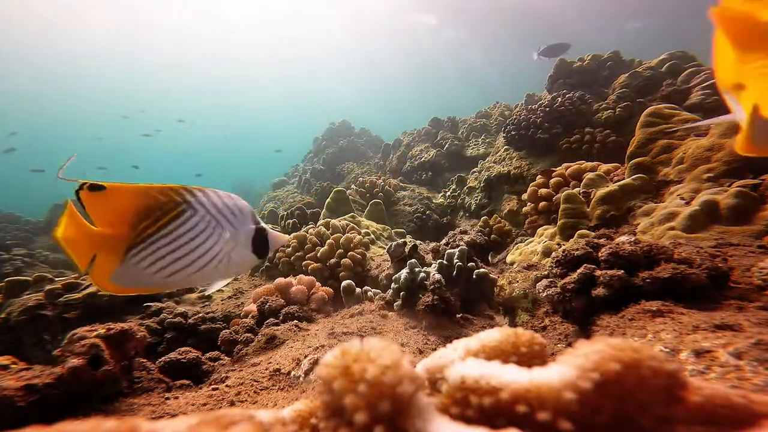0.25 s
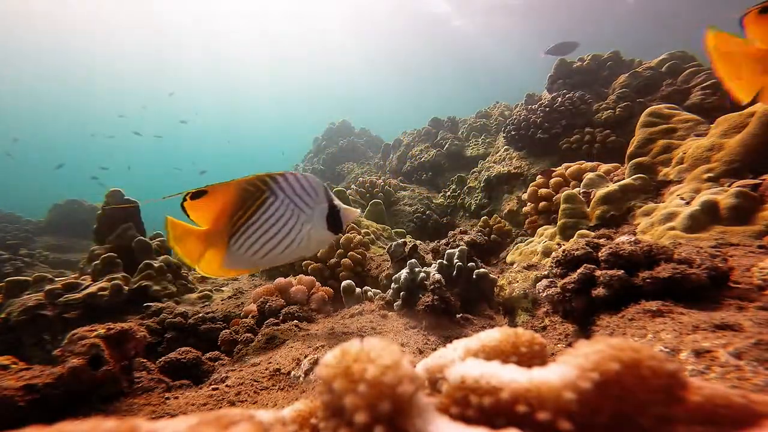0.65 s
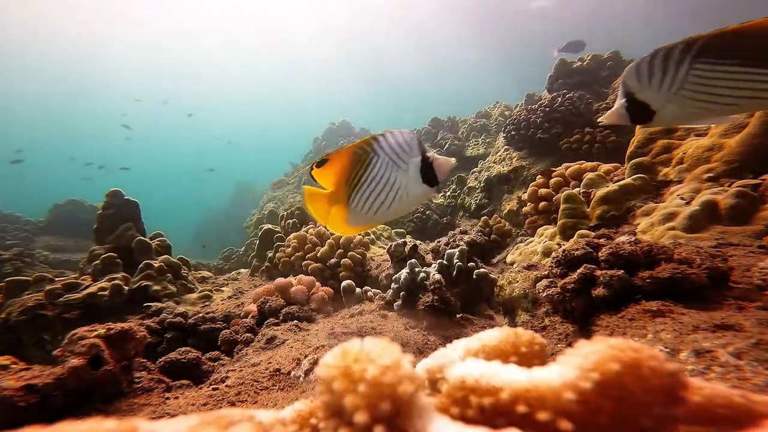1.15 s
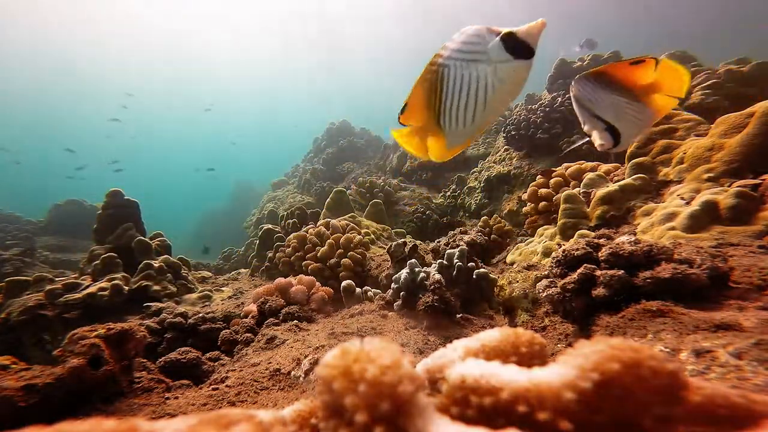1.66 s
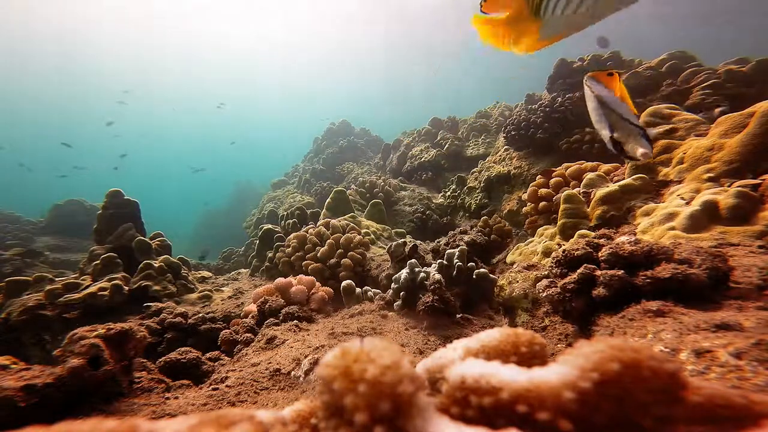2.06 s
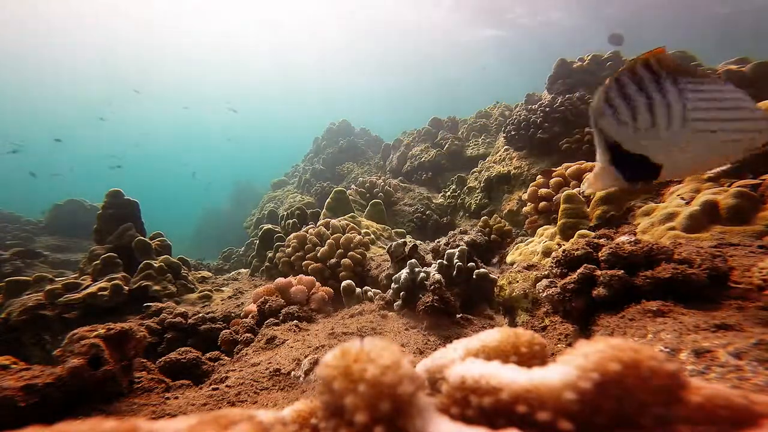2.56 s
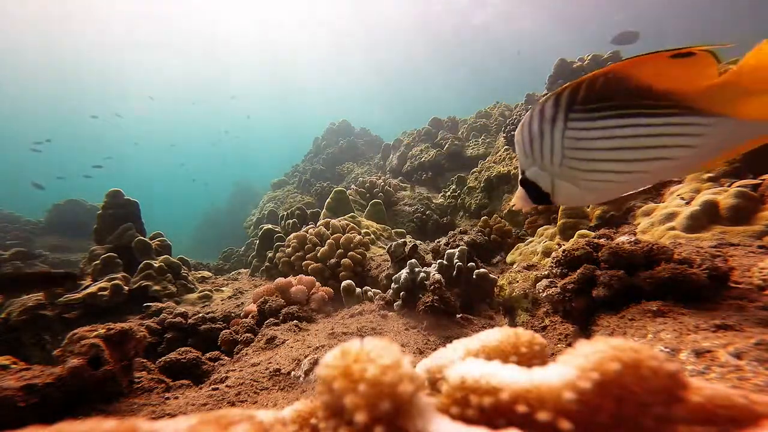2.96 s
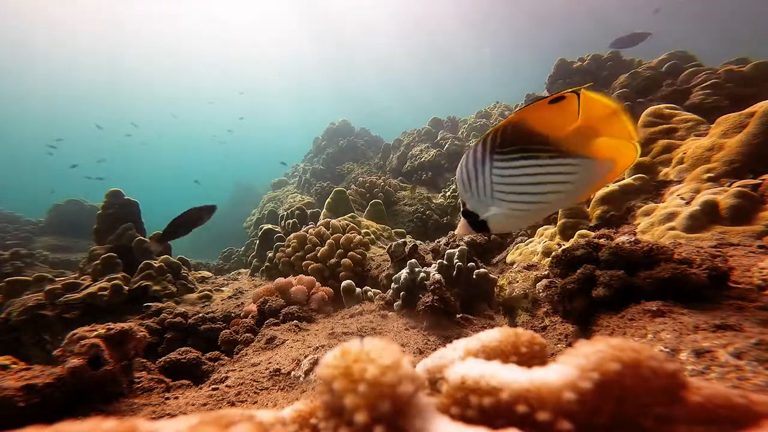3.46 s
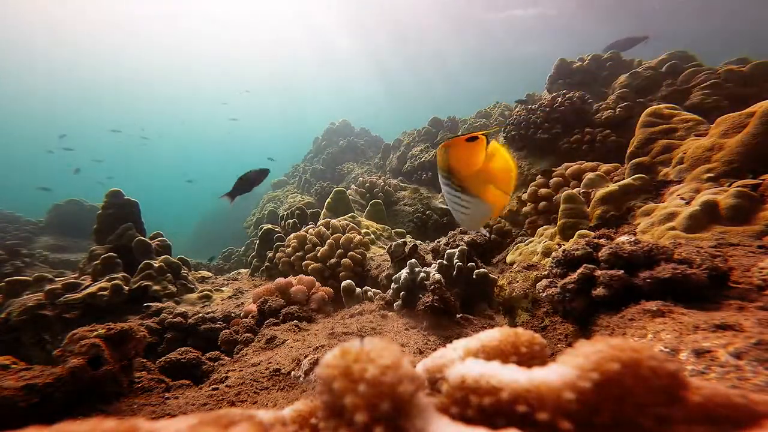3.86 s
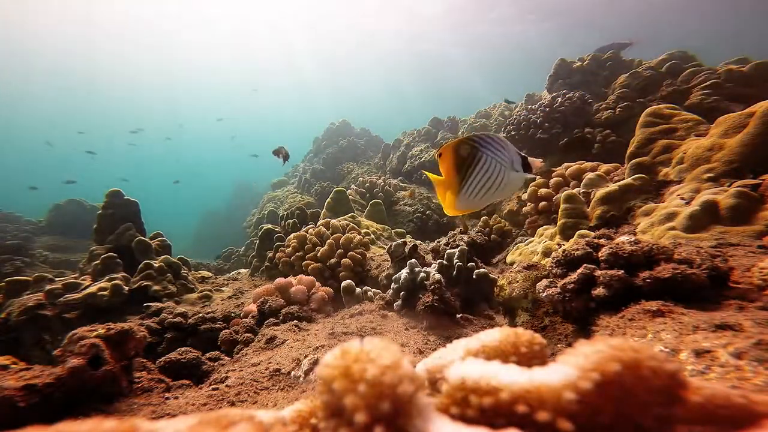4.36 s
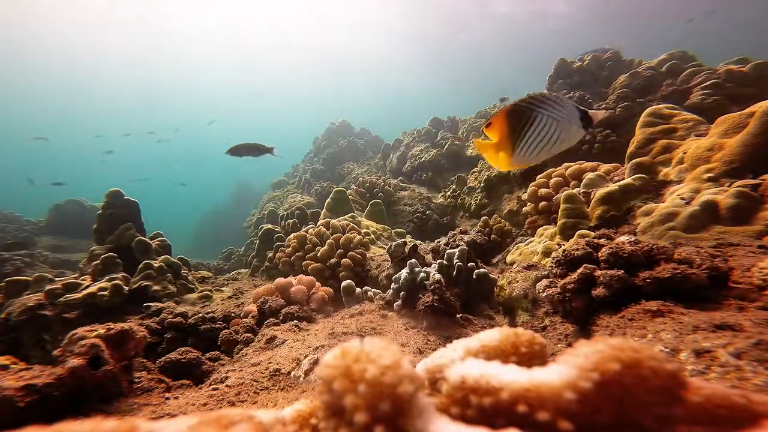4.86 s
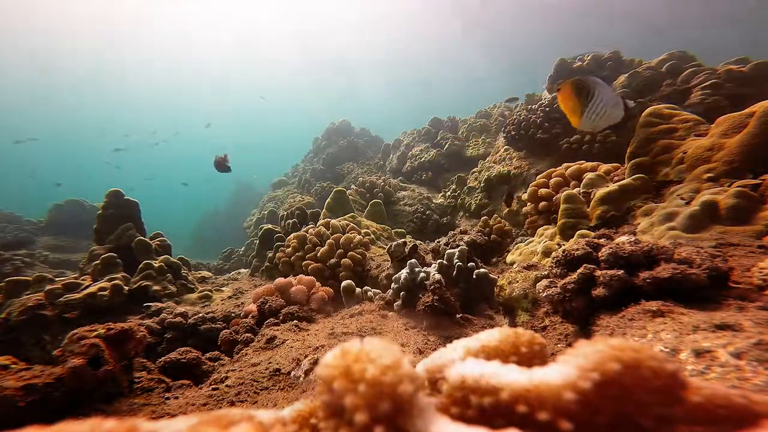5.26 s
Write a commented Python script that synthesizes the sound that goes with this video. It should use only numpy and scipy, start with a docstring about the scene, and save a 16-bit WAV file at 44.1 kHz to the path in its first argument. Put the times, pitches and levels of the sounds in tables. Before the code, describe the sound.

Close, boxy underwater sound from a microphone sealed in plastic. It starts nearly quiet, with soft surge, tiny snaps and a few faint taps. Irregular pecking follows: dry clacks, short hollow thuds and gritty scrapes, strongest from 3.3 seconds on. After the last rapid blows the background dips and a very deep rocking hum remains.

```python
"""Something, probably a fish, pecks at the plastic housing of a camera on a shallow reef, on the whole harder and harder.
Hard knocks and rasping scrapes each excite a bank of decaying modes: a boom in the mount, a thud in the wall,
a clack and a tick in the shell. Snapping shrimp, close by and far off, are bursts of noise with a short ring.
Under them lie the muffled surge of the water, as coloured noise, and a low sine for the wobble of the mount.
The microphone is inside the housing; shrimp and water dip briefly in level after the last blows."""
import sys
import numpy as np
from scipy import signal
from scipy.fft import rfft, irfft
from scipy.io import wavfile
from scipy.ndimage import uniform_filter1d

SR = 44100
rng = np.random.default_rng(int(sys.argv[2]) if len(sys.argv) > 2 else 0)


def dump(signal):
    """Clip the signal to [-1, 1] and save it as 16-bit WAV at the path in sys.argv[1]."""
    limited = np.clip(np.atleast_2d(signal).T, -1, 1)
    pcm = np.round(limited * 32767).astype(np.int16)
    wavfile.write(sys.argv[1], SR, pcm)


N = 243425
TIME = np.arange(N) / SR
RING_TIME = np.arange(int(.85 * SR)) / SR


def undb(db):
    """Decibels to gain."""
    return 10 ** (np.asarray(db) / 20)


def level(x, db, seconds):
    """Scale x so that its first seconds have the given rms level."""
    opening = x[:max(int(seconds * SR), 8)]
    return x * undb(db) / np.sqrt(np.mean(opening ** 2) + 1e-20)


def add(out, x, start):
    """Mix x into out from a start time in seconds."""
    i = max(int(start * SR), 0)
    out[i:i + len(x)] += x[:max(N - i, 0)]


def curve(rows):
    """Rows of (seconds, value) joined by straight lines."""
    return np.interp(TIME, *np.transpose(rows))


def colour(x, points):
    """Shape x with a spectrum of (Hz, dB) points, joined along a logarithmic frequency axis."""
    hz, db = np.transpose(points)
    f = np.fft.rfftfreq(len(x), 1 / SR) + 1  # the 1 Hz offset avoids log(0)
    gain = undb(np.interp(np.log(f), np.log(hz), db))
    return irfft(rfft(x) * gain, len(x))


def band(x, lo_hz, hi_hz, order=2):
    """Causal band-pass."""
    edges = [lo_hz, min(hi_hz, SR / 2 - 1000)]
    return signal.sosfilt(signal.butter(order, edges, "band", fs=SR, output="sos"), x)


def lowpass(hz):
    """Gentle second-order low-pass."""
    return signal.butter(2, hz, fs=SR, output="sos")


def walk(rate):
    """Smooth random wander: values held 1 / rate seconds, averaged twice, with a spread near 1."""
    k = int(SR / rate)
    steps = np.repeat(rng.standard_normal(N // k + 1), k)
    smooth = uniform_filter1d(uniform_filter1d(steps, k), k)
    return 1.3 * smooth[:N]  # makes up for the spread lost in averaging


# Spectrum of the surging water. Each row: frequency in Hz, relative density in dB per Hz.
WATER_SPECTRUM = [(20, -25.5), (32, -7), (45, -15), (80, -17), (150, -18.5), (250, -21), (700, -27),
                  (950, -31), (2000, -33), (3600, -39.5), (5200, -44.5), (7000, -44), (9000, -54.5),
                  (15000, -55)]


def water(wash_db=-59, swell_db=0.93):
    """Muffled wash of the surge: coloured noise whose lows and highs swell together and flicker apart."""
    wash = level(colour(rng.standard_normal(N), WATER_SPECTRUM), wash_db, N / SR)
    lows = signal.sosfiltfilt(lowpass(700), wash)
    highs = wash - lows
    flickering = lows * undb(1.2 * walk(9)) + highs * undb(.6 * walk(14))
    return flickering * undb(swell_db * walk(2.3))


# Rocking of the camera on its mount. Each row: time in seconds, rms level in dB before trim and flutter.
WOBBLE_LEVEL = [(0, -62.5), (3.7, -58), (4.6, -56.5), (5.24, -43), (5.33, -43), (5.52, -31)]


def wobble(wobble_hz=28.3, wander=0.32, flutter_db=1.0, trim_db=2.5):
    """The camera rocks unevenly on its mount, hardest after the last blows: a sine of wandering phase."""
    phase = 2 * np.pi * wobble_hz * TIME + wander * walk(13)
    swing = np.sqrt(2) * np.sin(phase)  # unit rms
    return swing * undb(curve(WOBBLE_LEVEL) + trim_db + flutter_db * walk(2.4))


# Modes of the housing and its mount, heard from inside.
# Each row: frequency in Hz, relative level in dB, time to fall by 60 dB in seconds.
HOUSING_MODES = [(71.6, 4.5, 0.056), (97.3, -11.5, 0.61), (124.4, 0.5, 0.06), (186, -3.5, 0.035),
                 (215.8, 0, 0.28), (275.3, -18.5, 0.14), (353, -18.5, 0.054), (388.5, -13.5, 0.073),
                 (470, -12, 0.027), (538.5, -9.5, 0.054), (593.4, -21, 0.12), (639, -13.5, 0.038),
                 (1164, 11, 0.035), (1278, -5.5, 0.063), (1534, -7, 0.057), (1771, 3.5, 0.024),
                 (1900, -13, 0.026), (1810, 0, 0.023), (2337, 2.5, 0.05), (2667, -7.5, 0.071),
                 (3730, 23, 0.0098), (4640, -4, .02), (4845, 9.5, 0.027), (5310, 8, 0.037),
                 (6890, 20.5, 0.017), (7920, 2.5, 0.024), (12700, -10, 0.023), (13200, -10, 0.014)]


def modes(lo, hi, centre_hz, focus_db, spot_db=3, detune=0.014):
    """Decaying sines between lo and hi Hz: focus favours those near the centre, each spot of contact others."""
    ring = np.zeros(len(RING_TIME))
    variations = rng.standard_normal((len(HOUSING_MODES), 3))
    for (hz, db, t60), (size, shift, side) in zip(HOUSING_MODES, variations):
        if lo <= hz < hi:
            t = RING_TIME[:int(t60 * SR)]
            # long bass waves span the whole housing, so the spot hardly matters to them
            spot_gain_db = spot_db * size * min(hz / 500, 1)
            gain_db = db + spot_gain_db - focus_db * np.log2(hz / centre_hz) ** 2
            tone = np.sin(2 * np.pi * hz * (1 + detune * shift) * t)
            ring[:len(t)] += np.sign(side) * undb(gain_db - 60 * t / t60) * tone
    return ring


def snap(centre_hz, crack_t60=0.015, tail_t60=0.051, tail_db=-10, focus_db=10, ring_db=-1, ring_share=0.81):
    """A collapsing bubble: a crack, scatter off the coral, and a housing ring a little below the crack."""
    t = RING_TIME[:SR // 20]
    fall = undb(-60 * t / crack_t60) + undb(tail_db - 60 * t / tail_t60)
    burst = rng.standard_normal(len(t)) * fall
    crack = band(band(burst, centre_hz * .7, centre_hz * 1.3, order=1), 1300, 11000)
    ring = modes(1600, 13500, centre_hz * ring_share, focus_db)[:len(t)]
    return level(level(crack, 0, .02) + level(ring, ring_db, .02), 0, .02)


# Shrimp snapping close to the housing.
# Each row: start in seconds, nominal peak level in dB before the background gain.
NEAR_SNAPS = [(0.1247, -41), (0.249, -20), (0.2915, -39), (0.395, -39.5), (0.8584, -35.5), (0.9212, -35),
              (1.0206, -21), (1.408, -34), (1.5948, -38.5), (1.7108, -31), (2.4074, -33), (2.523, -37),
              (2.9834, -36.5), (3.7538, -35.5), (3.9452, -34), (4.2825, -35.5)]
# a bigger bubble is louder and lower: a reference level and centre, and dB of level per octave of pitch
BIG_SNAP_DB, BIG_SNAP_HZ, SNAP_DB_PER_OCTAVE = -26, 2250, 35.5


def shrimp(crest_db=21, far_db=-75, spread_db=2.5, far_hz=4600, count=330):
    """A few near snaps over the crackle of many far ones at random times."""
    out = np.zeros(N)
    for start, peak_db in NEAR_SNAPS:
        centre_hz = BIG_SNAP_HZ * 2 ** ((BIG_SNAP_DB - peak_db) / SNAP_DB_PER_OCTAVE)
        add(out, snap(centre_hz) * undb(peak_db - crest_db), start)
    for when, nearness, pitch in rng.random((count, 3)):
        db = far_db + spread_db * min(-np.log(nearness), 3.5)
        centre_hz = far_hz * 2 ** (1.4 * (pitch - .5))
        add(out, snap(centre_hz) * undb(db), when * N / SR)
    return out


# Dense short ringing of the shell between its modes. Each row: frequency in Hz, relative level in dB.
SHELL_SPECTRUM = [(60, 14.5), (200, -11), (550, 6), (900, 7.5), (1300, 16), (2300, 18), (3200, 7),
                  (3800, 12.5), (5300, -9), (6100, -35), (7200, -22), (10500, -18), (12500, -3),
                  (15000, -27)]
# The registers boom, thud, clack and tick. Each row: low edge in Hz, high edge in Hz.
REGISTER_EDGES = [(45, 250), (250, 780), (1050, 3300), (3300, 15000)]


def housing(wall_hz, clack_hz, focus_db, shell_db, wall_t60=0.024, boom_hz=165, usual_wall_hz=520,
            shell_t60=0.013):
    """Ring of the housing after one contact, in each register: modes, a wall swing and dense shell noise."""
    t = RING_TIME[:SR // 10]
    shell = colour(rng.standard_normal(len(t)), SHELL_SPECTRUM) * undb(-60 * t / shell_t60)
    boom_edges, thud_edges, clack_edges, tick_edges = REGISTER_EDGES
    # a lower wall pitch goes with a boom that reaches the deepest modes of the mount
    boom_centre_hz = boom_hz * min(wall_hz / usual_wall_hz, 1) ** 2
    boom = modes(*boom_edges, boom_centre_hz, focus_db=6.5)
    # the wall, loaded by the water, swings only a few times
    wall = -np.sin(2 * np.pi * wall_hz * t) * undb(-60 * t / wall_t60)
    thud = wall + modes(*thud_edges, wall_hz, focus_db=7)[:len(t)]
    # the thud reaches higher when the wall pitch is higher
    thud = signal.sosfilt(lowpass(1.7 * wall_hz), thud)
    clack = modes(*clack_edges, clack_hz, focus_db)[:len(t)]
    tick = modes(*tick_edges, clack_hz, 0)[:len(t)]
    registers = []
    for ring, edges, dense_db in zip((boom, thud, clack, tick), REGISTER_EDGES, shell_db):
        mixed = level(ring, 0, .02)
        add(mixed, level(band(shell, *edges), dense_db, .02), 0)
        registers.append(band(mixed, *edges, order=3))
    return registers


# How hard the pecking leans on the housing, which adds boom and grit.
# Each row: time in seconds, press in dB.
PRESS_CURVE = [(0, 5.5), (1.6, -5), (2.6, 0.5), (3.3, -1.5), (4.2, 1), (5.0, 2), (5.28, 5.5)]


def press_at(start):
    """Press in dB at the start of a contact."""
    return np.interp(start, *np.transpose(PRESS_CURVE))


def register_levels(start, strength_db, hardness_db, boom_db, tick_db, grit_per_press=1):
    """Levels in dB: all follow the strength, clack and tick the hardness, boom and tick the press."""
    press_db = press_at(start)
    boom_level_db = strength_db + boom_db + press_db
    clack_level_db = strength_db + hardness_db
    tick_level_db = clack_level_db + tick_db + grit_per_press * press_db
    return boom_level_db, strength_db, clack_level_db, tick_level_db


# Scrapes along the housing.
# Each row: start in seconds, end in seconds, strength in dB, hardness (clack over thud) in dB, both before trim.
SCRAPE_CONTACTS = [(0.151, 0.226, -50, -11), (1.425, 1.461, -43, -13), (1.5, 1.583, -58.5, -5),
                   (1.778, 1.812, -38.5, -9), (1.822, 1.937, -49.5, -9.5), (1.919, 2.013, -41, -7.5),
                   (2.007, 2.095, -45.5, 0), (2.168, 2.214, -41, -9.5), (2.318, 2.339, -43.5, -8),
                   (2.574, 2.643, -40, -10.5), (2.806, 2.876, -40, -12), (3.095, 3.133, -45.5, -13.5),
                   (3.3, 3.386, -31, -10.5), (3.586, 3.671, -32.5, -10), (3.866, 3.901, -34.5, -6),
                   (4.118, 4.132, -32, -11), (4.149, 4.207, -32.5, -12), (4.43, 4.52, -40, -9),
                   (4.746, 4.818, -41, -8), (5.085, 5.109, -41.5, -22), (5.168, 5.233, -33.5, -17.5),
                   (5.241, 5.267, -27.5, -14), (5.277, 5.296, -30, -9)]


def scrapes(wall_hz=510, clack_hz=1800, slips_per_s=750, scatter_db=6, grit=0.069, fade_share=0.092,
            strength_trim_db=0.72, hardness_trim_db=0.9, boom_db=-6.5, tick_db=-8.5,
            catch_db=2.5, catches_per_s=110, firm_db=3, sag_hz_per_db=28):
    """Stick and slip: a run of uneven little contacts with fine grit between, which catches and lets go."""
    out = np.zeros(N)
    grip = undb(catch_db * walk(catches_per_s))
    for start, end, strength, hardness in SCRAPE_CONTACTS:
        length = max(end - start, .005)
        n = int(length * SR)
        slip_sizes = undb(scatter_db * rng.standard_normal(n).clip(-2, 2))
        slips = (rng.random(n) < slips_per_s / SR) * slip_sizes
        force = slips - slips.mean() + grit * rng.standard_normal(n)
        force = force * grip[int(start * SR):][:n] * signal.windows.tukey(n, fade_share)
        # pressing more than firmly lowers the wall pitch
        sag_hz = sag_hz_per_db * np.clip(press_at(start) - firm_db, 0, 5)
        rings = housing(wall_hz - sag_hz, clack_hz, focus_db=1, shell_db=(-6.5, -8.5, 2.5, 3))
        levels = register_levels(start, strength + strength_trim_db, hardness + hardness_trim_db,
                                 boom_db, tick_db)
        for ring, db in zip(rings, levels):
            add(out, level(signal.fftconvolve(force, ring), db, length), start)
    return out


# Knocks on the housing.
# Each row: start in seconds, strength in dB and hardness (clack over thud) in dB, both before trim,
# wall pitch in Hz, clack centre in Hz.
KNOCK_CONTACTS = [(0.234, -41.5, -42.5, 490, 1900), (0.44, -46, -20, 550, 1900),
                  (0.691, -45, -25, 522, 1600), (1.418, -34, -5.5, 570, 1290),
                  (1.441, -39.5, -7, 616, 1500), (1.526, -36.5, -14, 615, 1450),
                  (1.629, -32, -3.5, 396, 1780), (1.774, -39.5, -7, 590, 2250),
                  (2.001, -35, -7.5, 497, 1900), (2.151, -40.5, 2.5, 453, 1480),
                  (2.2039, -23.5, -27, 525, 1300), (2.453, -30, -24, 498, 1300),
                  (2.615, -35, -11, 433, 2300), (2.655, -33.5, -2.5, 494, 1800),
                  (2.7606, -27, -5, 540, 1600), (2.774, -32.5, -30, 526, 1300), (2.857, -26, -7, 518, 1900),
                  (3.033, -32, -8, 535, 1170), (3.268, -21, -2, 567, 1690), (3.333, -33, -2, 496, 1550),
                  (3.349, -31.5, -6.5, 553, 1950), (3.379, -27, -12, 476, 1600),
                  (3.5483, -20, -10.5, 580, 1270), (3.557, -17.5, -16, 550, 1180),
                  (3.646, -28, -27, 460, 2200), (3.8268, -28, 0, 470, 1500), (4.053, -41.5, 9, 625, 1370),
                  (4.0552, -16, -21.5, 643, 1200), (4.144, -23, -11, 490, 1270),
                  (4.184, -27.5, -8.5, 483, 2150), (4.191, -22.5, -17, 470, 1900),
                  (4.411, -23.5, -2.5, 516, 1340), (4.4663, -15.5, -13.5, 510, 1800),
                  (4.7151, -21, -5, 486, 1520), (4.734, -16.5, -15, 480, 2250),
                  (4.809, -28, -20, 444, 2310), (4.9813, -15.5, -9, 479, 1900),
                  (5.12, -39.5, -9, 470, 2000), (5.191, -28, -9.5, 470, 2250), (5.265, -36, -3, 410, 2000),
                  (5.2753, -13.5, -15.5, 380, 1350), (5.296, -24, -11, 406, 1400),
                  (5.3192, -19, -14.5, 416, 1500), (5.332, -43.5, -1.5, 366, 1250)]


def knocks(strength_trim_db=-1.06, hardness_trim_db=-0.9, boom_db=-12, tick_db=-14.5, focus_db=20,
           crunch=0.24, crunch_t60=0.015):
    """Single hard contacts: an impulse and a crunch of milliseconds that only the upper registers follow."""
    out = np.zeros(N)
    t = RING_TIME[:SR // 50]
    for start, strength, hardness, wall_hz, clack_hz in KNOCK_CONTACTS:
        rough_tip = crunch * rng.standard_normal(len(t)) * undb(-60 * t / crunch_t60)
        force = (t == 0) + rough_tip
        boom, thud, clack, tick = housing(wall_hz, clack_hz, focus_db, shell_db=(3.5, -14.5, -1, 0))
        rings = boom, thud, signal.fftconvolve(clack, force), signal.fftconvolve(tick, force)
        levels = register_levels(start, strength + strength_trim_db, hardness + hardness_trim_db,
                                 boom_db, tick_db)
        for ring, db in zip(rings, levels):
            add(out, level(ring, db, .02), start)
    return out


# Gain of shrimp and water, which dips briefly after the last blows. Each row: time in seconds, gain in dB.
BACKGROUND_GAIN = [(0, 3), (1.2, 3.5), (3, 5), (5.3, 4), (5.37, -3.5), (5.52, 1.5)]


def scene():
    """Everything as it reaches the microphone inside the housing."""
    background = (shrimp() + water()) * undb(curve(BACKGROUND_GAIN))
    return (knocks() + scrapes() + background + wobble())[None]


def record(dry, top_hz=15000):
    """The camera cuts the top with a steep low-pass."""
    return signal.sosfilt(signal.ellip(8, .2, 70, top_hz, fs=SR, output="sos"), dry)


dry = scene()
out = record(dry)
dump(out)
```